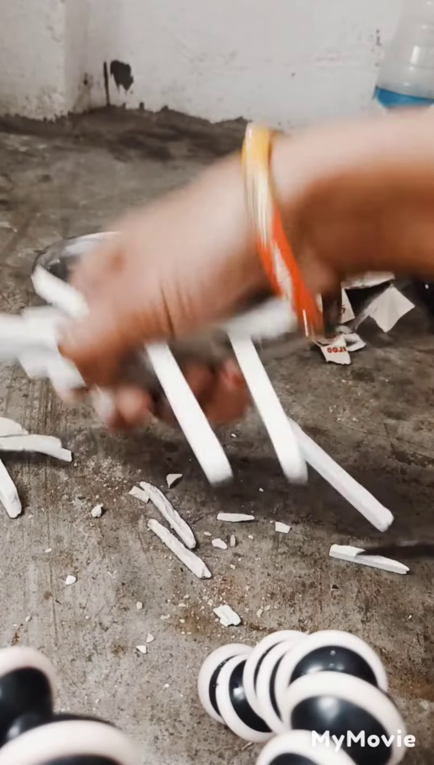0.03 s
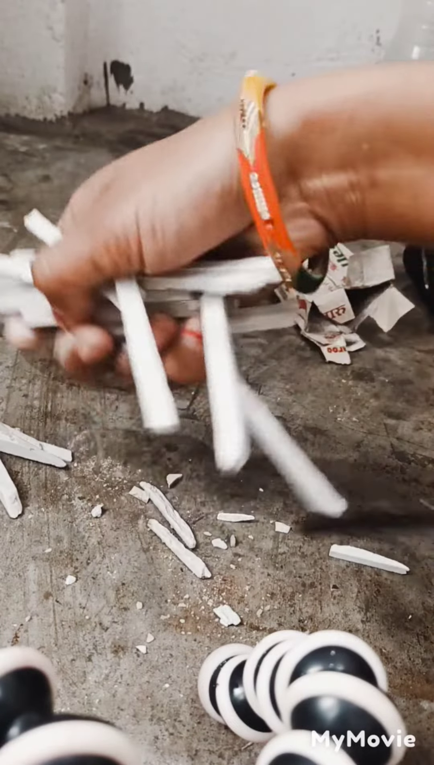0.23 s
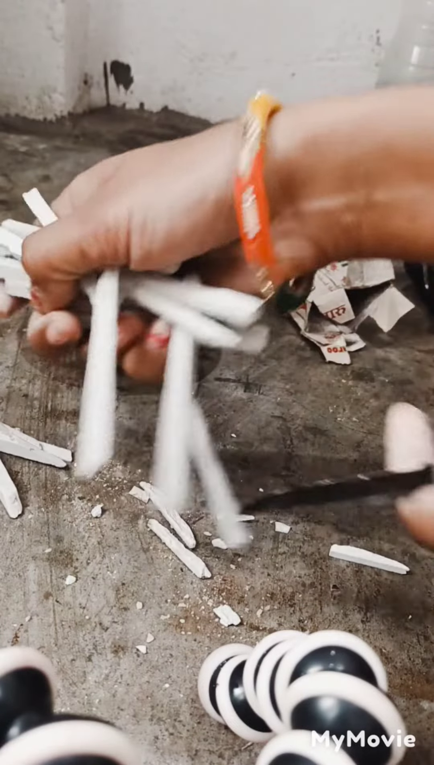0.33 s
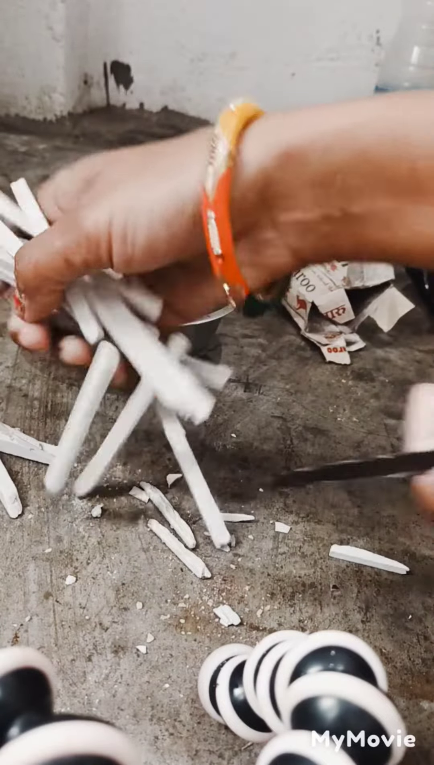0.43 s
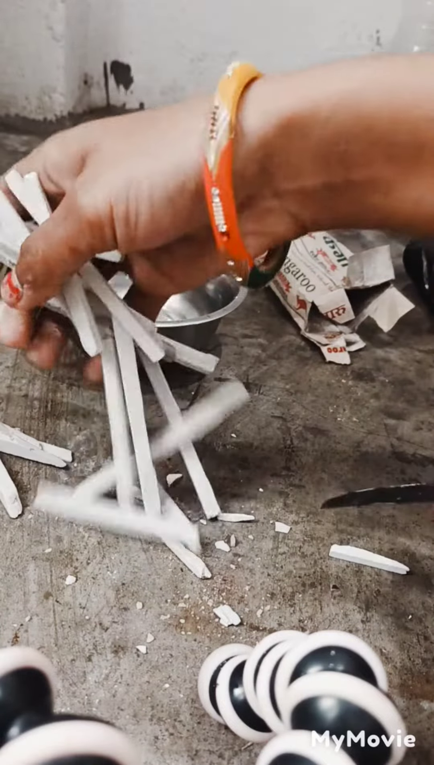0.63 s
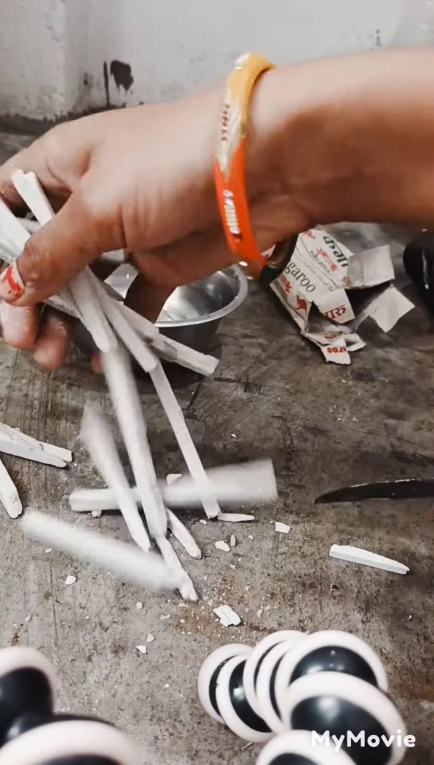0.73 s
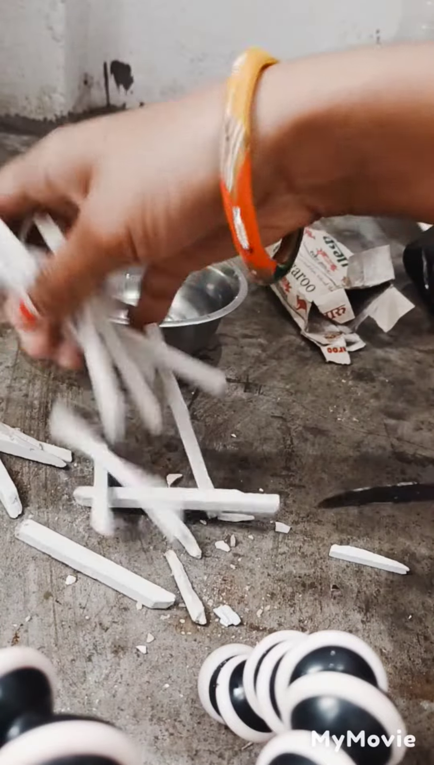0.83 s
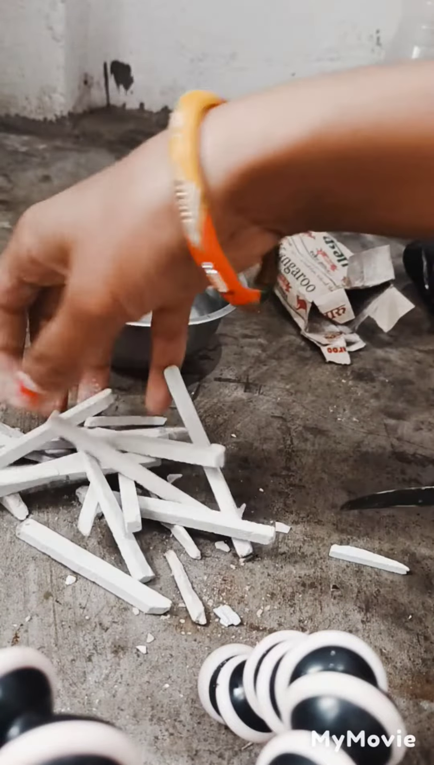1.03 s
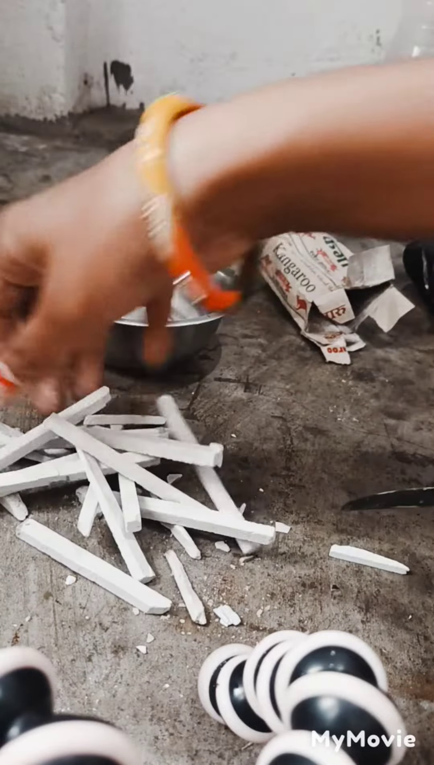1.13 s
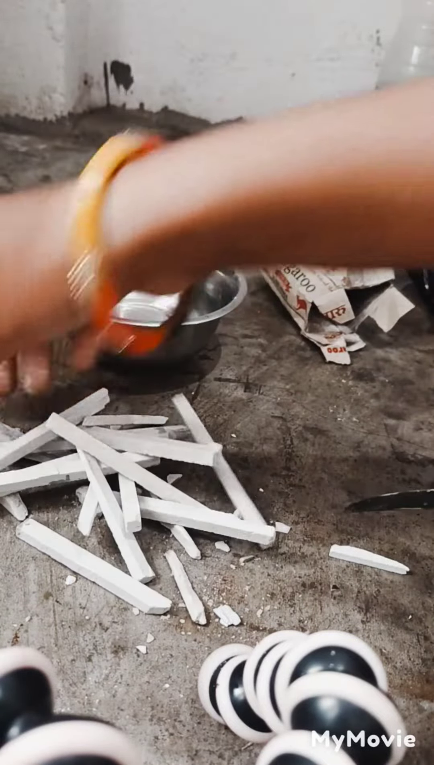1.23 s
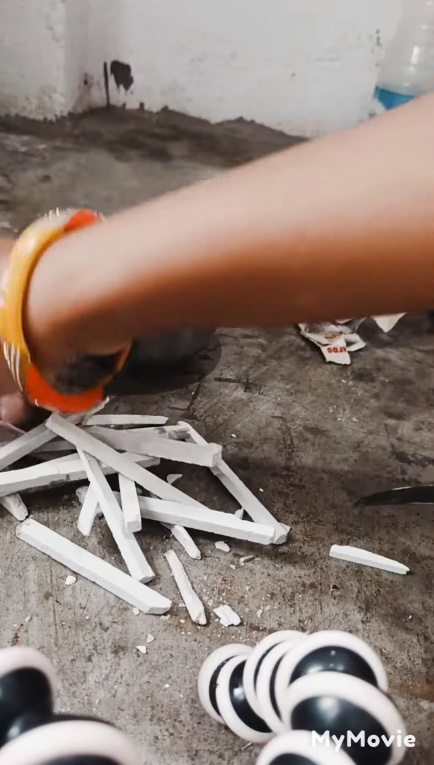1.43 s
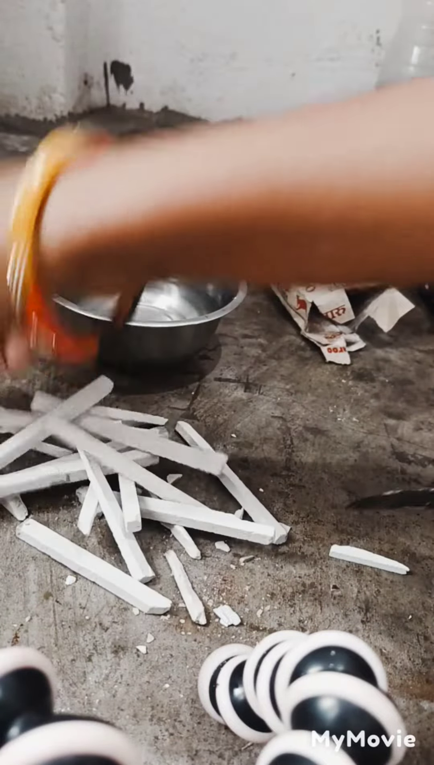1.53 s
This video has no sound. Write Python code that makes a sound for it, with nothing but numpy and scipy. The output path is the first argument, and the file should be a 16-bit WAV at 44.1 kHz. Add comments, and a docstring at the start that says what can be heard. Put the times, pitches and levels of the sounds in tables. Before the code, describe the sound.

Slate pencils dropped in a loose pile on concrete, sharp bright clicks in a small bare room

```python
"""Slate pencils dropped in a pile

A hand gathers stone slate pencils and lets them drop on a concrete floor, close to the microphone.
Each contact is a hard click of shaped noise with a very short ring; two spills rattle with small contacts.
A small bare room answers with a bright noise tail, standing waves and a hollow bloom.
A low boom of tone and narrow noise, faint noise swishes and steady air lie behind."""
import sys
import numpy as np
from scipy import signal
from scipy.fft import rfft, irfft
from scipy.io import wavfile

SR = 44100
rng = np.random.default_rng(int(sys.argv[2]) if len(sys.argv) > 2 else 0)


def dump(signal):
    """Clip the signal to [-1, 1] and save it as 16-bit WAV at the path in sys.argv[1]."""
    limited = np.clip(np.atleast_2d(signal).T, -1, 1)
    pcm = np.round(limited * 32767).astype(np.int16)
    wavfile.write(sys.argv[1], SR, pcm)


N = 70560

# Single contacts. Each row: start in seconds, level in dB, knock (lows) in dB, edge (highs) in dB,
# sheen (top treble) in dB, chatter decay in seconds, ring in Hz, ring level in dB,
# left over right in dB, room level in dB.
CONTACTS = [ (0.0895, -7, 3.5, -6, -4, 0.004, 1444, -5, 1, -4),
            (0.2202, -15, 8.5, 9.5, 6.5, 0.0028, 988, -10, 0, -3),
            (0.309, -17, -31, -10, -11, 0.0013, 2520, -13, 2.5, -6.5),
            (0.3991, -31.5, 4.5, 10.5, -12, 0.0022, 2650, -17.5, -4, -7.5),
            (0.4273, -1.5, -1, 0, 2, .001, 8710, 6.5, 1.5, 5),
            (0.5473, -11, 10, -3.5, -6, 0.0054, 984, -20, 3, -3.5),
            (0.6386, -15, 4.5, 5, 3, 0.00041, 9260, 4.5, 2.5, 1),
            (0.6672, -13, 3.5, 8, 0.5, 0.0013, 2570, -5.5, -1, -0.5),
            (0.681, -27, -3, 2, -8, 0.00088, 6750, -11.5, 0, -18),
            (0.718, -17.5, 3.5, -2.5, 2.5, 0.0027, 7000, -26, 4, -8),
            (0.7729, -32.5, 18.5, -22, -5.5, 0.002, 6800, -17.5, 2, -13.5),
            (0.7790, -23.5, 4, 8, -5, 0.0022, 10100, -8.5, 3, 7),
            (0.7931, -5.5, -14.5, 8.5, -3, 0.00032, 7560, 7, 1.5, -4.5),
            (0.8142, -27, -10.5, 16, 8, 0.00092, 2934, -6, 2, -4.5),
            (0.8578, -14, -41, -3.5, 1, 0.0015, 2460, -3.5, 0.5, -3.5),
            (0.884, -21, 7, 11.5, 3.5, .001, 9700, -0.5, 1, -2.5),
            (0.9136, -17.5, -7, -3, -4.5, 0.00087, 2395, -11.5, -0.5, 16),
            (0.9196, -6.5, -10, 7.5, 5, 0.00062, 9330, 6.5, -2, 6.5),
            (0.9262, -8, 1.5, -21, -11, 0.00076, 2510, -16, -8, 5.5),
            (0.9354, 11, -12.5, -9, -12, 0.001, 5010, 9.5, -1, -5.5),
            (0.9887, 3, -7, 6, -1.5, 0.0033, 7015, 14.5, -1.5, -1.5),
            (1.0298, -6, -2.5, 2.5, 3, 0.001, 4980, -3, 7, 0),
            (1.0332, -7, -2.5, 7, -0.5, 0.0044, 6940, 2.5, 0, 2),
            (1.0441, -5, -3, -3.5, 7, 0.00043, 2417, 0, -5, 0.5),
            (1.151, -12, -1.5, -3.5, -29, 0.0011, 10370, -1.5, -1, -0.5),
            (1.3028, 4.5, -6.5, -10.5, -4.5, 0.0011, 5020, 10.5, 4, -4.5),
            (1.5595, -18.5, -6, 7, -10, 0.0014, 6510, -9, 0, 0.5), ]
# Colour of a stone contact. Each row: frequency in Hz, gain in dB.
STONE_COLOUR = [(100, -17), (250, -17), (450, -8), (720, -11.5), (1000, -4), (1600, -9.5), (2400, -3.5),
                (3300, -5), (5000, -1), (7100, -0.5), (8200, -10), (9700, -0.5), (11000, -2.5),
                (13100, -18), (14900, -4.5), (16000, -29.5)]
# Rattles of small contacts. Each row: start in seconds, length in seconds, level in dB,
# knock in dB, edge in dB.
RATTLES = [(0.441, .065, -12.5, 5, 2), (.945, .13, -12, 0, 0.5)]
# Room tail. Each row: frequency in Hz, gain in dB, T60 in seconds, left over right in dB.
ROOM_TAIL = [(100, -8, 0.79, 17.5), (250, 16.5, 0.56, 5.5), (430, 14, 0.6, 5.5), (540, 12, 0.21, 20),
             (730, -6.5, 0.31, -16), (926, 7.5, 0.44, 7.5), (1600, 6, 0.34, -6), (2470, 3, 0.3, 1.5),
             (5500, 3.5, 0.31, 0.5), (9270, -0.5, 0.25, 2), (15000, -2, 0.14, -10.5)]
# Standing waves of the room. Each row: frequency in Hz, level in dB, T60 in seconds, left over right in dB.
STANDING_WAVES = [(171, -62, 0.58, 12), (307, -65, .4, -10), (705, -54, 0.87, -7.5),
                  (1002, -57.5, .55, -10.5)]
# Low boom swells. Each row: peak in seconds, rise in seconds, fall in seconds, level in dB,
# upper modes in dB.
BOOM_SWELLS = [(.155, 0.048, 0.073, -70, -14), (0.532, 0.062, 0.061, -50, -3.5),
               (0.718, 0.3, 0.19, -69.5, -1.5), (1.011, 0.19, 0.14, -64.5, 10),
               (1.126, 0.11, 0.046, -56.5, 8), (1.45, 0.21, .25, -82.5, 6.5)]
# Upper boom resonances. Each row: frequency in Hz, level in dB.
BOOM_UPPER_MODES = [(178, -2), (240, -4), (304, -3)]
# Faint hollow swishes. Each row: middle in seconds, length in seconds, level in dB, centre in Hz.
SWISH_EVENTS = [(0.053, 0.15, -66.5, 678), (1.284, 0.04, -71, 660), (1.551, 0.073, -71.5, 650)]
# Colour of the background air. Each row: frequency in Hz, gain in dB.
AIR_COLOUR = [(25, -20.5), (50, -30), (80, 7.5), (120, -4), (180, 3.5), (280, -9.5), (450, -11.5),
              (700, -18), (1000, -19.5), (2500, -14), (6000, -20.5), (10000, -21.5), (16000, -26)]

# Crossover ranges of the colour controls: knock acts below its range, edge and sheen above theirs.
KNOCK_HZ, EDGE_HZ, SHEEN_HZ = (1800, 4540), (5000, 8800), (11200, 11870)
THIN_DB_PER_DB, THIN_HZ = 2.6, 1000  # pencil on pencil: extra bass lost per dB of missing knock
CHATTER_RISE_S = 0.0018
EVENNESS = 0.55  # 0 leaves the noise spectrum ragged, 1 makes it flat
RING_T60_S, RING_RISE_S = 0.011, 0.0006
TWIN_RATIO, TWIN_DB = 1.06, -7  # second bending mode relative to the first

RATTLE_PER_S, RATTLE_FADE_DB, RATTLE_ROOM_DB = 140, -5.5, 0
RATTLE_CHATTER_S, RATTLE_RING_DB = 0.0011, 4

EARLY_S, EARLY_DB = 0.012, -4
BASS_BUILD_S, BASS_HZ = 0.016, 650
HOLLOW_FROM_HZ, HOLLOW_TO_HZ, HOLLOW_S, HOLLOW_DB, HOLLOW_LEFT_DB = 560, 348, 0.1, -39.5, 6.5

BOOM_HZ, BOOM_WIDTH_HZ, BOOM_LEFT_DB = 81, 13.6, 3.5
SWISH_WIDTH_HZ = 126
AIR_DB, AIR_SHARED_HZ = -71, 500
CUTOFF_HZ = 16300


def clicks():
    """Single pencils strike each other and the floor; the room answers each blow."""
    out = np.zeros((2, N))
    for start_s, *stone, left_db, room_db in CONTACTS:
        click = contact(*stone)
        add(out, start_s, click * sides(left_db))
        add(out, start_s, amp(room_db) * room(click))
    return out


def contact(level_db, knock_db, edge_db, sheen_db, chatter_s, ring_hz, ring_db, size=2048):
    """Stone chatters on stone for a few milliseconds; the pencil rings briefly in two close bending modes."""
    t, hz = np.arange(size) / SR, np.fft.rfftfreq(size, 1 / SR)
    chatter = np.exp(-t / max(chatter_s, 1 / SR)) * (1 - np.exp(-t / CHATTER_RISE_S))
    grit = rfft(rng.standard_normal((2, size)) * chatter)
    evening_db = -EVENNESS * 20 * np.log10(abs(grit) + 1e-9)
    grit = np.array([g * causal(db) for g, db in zip(grit, evening_db)])
    grit /= np.sqrt(np.mean(abs(grit) ** 2, axis=1, keepdims=True))

    colour_db = level_db + read(STONE_COLOUR, hz)
    colour_db += np.interp(hz, KNOCK_HZ, [knock_db, 0])
    colour_db -= THIN_DB_PER_DB * max(-knock_db, 0) / (1 + (hz / THIN_HZ) ** 4)
    colour_db += np.interp(hz, EDGE_HZ, [0, edge_db])
    colour_db += np.interp(hz, SHEEN_HZ, [0, sheen_db])
    click = irfft(grit * causal(colour_db))

    fade = decay(t, RING_T60_S) * (1 - np.exp(-t / RING_RISE_S))
    fade *= 2 / fade.sum()
    for mode_hz, db in [(ring_hz, ring_db), (ring_hz * TWIN_RATIO, ring_db + TWIN_DB)]:
        click += amp(db) * fade * np.sin(2 * np.pi * (mode_hz * t + rng.random((2, 1))))
    return click


def spills():
    """Loose pencils settle in a fading run of small contacts."""
    out = np.zeros((2, N))
    rings_hz = [row[6] for row in CONTACTS]
    for start_s, length_s, level_db, knock_db, edge_db in RATTLES:
        count = round(length_s * RATTLE_PER_S)
        for k in range(count):
            part = (k + rng.random()) / count
            db = level_db + RATTLE_FADE_DB * part
            ring_hz, ring_db = rng.choice(rings_hz), db + RATTLE_RING_DB
            click = contact(db, knock_db, edge_db, 0, RATTLE_CHATTER_S, ring_hz, ring_db)
            add(out, start_s + part * length_s, click)
    return out + amp(RATTLE_ROOM_DB) * room(out)[:, :N]


def room(sound, size=32768):
    """Dense wall reflections, weaker at first; the bass builds more slowly and the top treble dies soonest."""
    hz, t, z = signal.stft(rng.standard_normal((2, size)), SR, nperseg=512)
    t60_s = read(ROOM_TAIL, hz, axis=2)[:, None]
    build = np.where(hz[:, None] < BASS_HZ, np.minimum(t / BASS_BUILD_S, 1), 1)
    equal_energy = np.sqrt(2 * np.log(1000) / t60_s / SR)  # keeps the level independent of T60
    z = z * build * amp(read(ROOM_TAIL, hz)[:, None]) * decay(t, t60_s) * equal_energy
    z = z * sides(read(ROOM_TAIL, hz, axis=3))[:, :, None]
    tail = signal.istft(z, SR, nperseg=512)[1]

    t = np.arange(tail.shape[1]) / SR
    for mode_hz, db, mode_t60_s, left_db in STANDING_WAVES:
        wave = np.sin(2 * np.pi * (mode_hz * t + rng.random())) * np.minimum(t / BASS_BUILD_S, 1)
        tail = tail + amp(db) * sides(left_db) * wave * decay(t, mode_t60_s)
    tail = tail + hollow(t)
    return signal.fftconvolve(sound, tail * np.where(t < EARLY_S, amp(EARLY_DB), 1), axes=1)


def hollow(t):
    """A short, hollow bloom in the room's answer, sinking in pitch as it swells and fades."""
    part = np.minimum(t / HOLLOW_S, 1)
    turns = np.cumsum(HOLLOW_FROM_HZ + (HOLLOW_TO_HZ - HOLLOW_FROM_HZ) * part) / SR
    bloom = np.sin(np.pi * part) ** 2 * np.sin(2 * np.pi * turns)
    return amp(HOLLOW_DB) * sides(HOLLOW_LEFT_DB) * bloom


def boom():
    """A low tone and a few wavering resonances swell and fade behind the clatter."""
    t, out = np.arange(N) / SR, np.zeros((2, N))
    tone = np.sin(2 * np.pi * BOOM_HZ * t)
    for peak_s, rise_s, fall_s, level_db, upper_db in BOOM_SWELLS:
        ramp = np.interp(t, [peak_s - rise_s, peak_s, peak_s + fall_s], [0, 1, 0])
        swell = np.sin(np.pi / 2 * ramp) ** 2
        # / sqrt(2): same RMS as a sine
        upper = sum(amp(db) * band(hz, BOOM_WIDTH_HZ) / np.sqrt(2) for hz, db in BOOM_UPPER_MODES)
        out += amp(level_db) * swell * (tone + amp(upper_db) * sides(BOOM_LEFT_DB) * upper)
    return out


def swishes():
    """Soft, narrow swells of noise, barely above the background."""
    t, out = np.arange(N) / SR, np.zeros((2, N))
    for middle_s, length_s, level_db, centre_hz in SWISH_EVENTS:
        noise = np.array([band(centre_hz, SWISH_WIDTH_HZ) for _ in range(2)])
        swell = np.cos(np.pi * np.clip((t - middle_s) / length_s, -0.5, 0.5))
        out += amp(level_db) * noise * swell
    return out


def air():
    """Faint steady noise, nearly alike in both ears in the bass and independent in the treble."""
    hz = np.fft.rfftfreq(N, 1 / SR)
    left_right_shared = rfft(rng.standard_normal((3, N)))
    same = 1 / (1 + (hz / AIR_SHARED_HZ) ** 2)
    z = left_right_shared[:2] * np.sqrt(1 - same) + left_right_shared[2] * np.sqrt(same)
    noise = irfft(z * amp(read(AIR_COLOUR, hz)), N)
    return amp(AIR_DB) * noise / noise.std()


def band(centre_hz, width_hz):
    """Narrow noise of unit RMS: a resonance that wavers; the width is the Gaussian's sigma."""
    hz = np.fft.rfftfreq(N, 1 / SR)
    bell = np.exp(-((hz - centre_hz) / width_hz) ** 2 / 2)
    noise = irfft(rfft(rng.standard_normal(N)) * bell, N)
    return noise / noise.std()


def decay(t, t60_s):
    """Exponential fade, 60 dB down after T60."""
    return np.exp(-np.log(1000) * t / t60_s)


def causal(db):
    """Minimum-phase response for a gain curve."""
    log_gain = np.log(amp(np.concatenate([db, db[-2:0:-1]])))
    return np.exp(np.conj(signal.hilbert(log_gain)))[:len(db)]


def amp(db):
    """Decibels to gain."""
    return 10 ** (np.asarray(db) / 20)


def read(points, hz, axis=1):
    """One column of a table, joined on a log-frequency axis."""
    table = np.transpose(points)
    return np.interp(np.log(hz + 1), np.log(table[0] + 1), table[axis])


def sides(db):
    """Left and right gains for a level difference."""
    return amp(np.array([db, -db]) / 2).reshape(2, -1)


def add(mix, start_s, sound):
    """Mixes a sound in at a time, cut at the end of the mix."""
    part = mix[:, max(round(start_s * SR), 0):][:, :sound.shape[1]]
    part += sound[:, :part.shape[1]]


def scene():
    """Clicks, rattle, boom, swishes and air together."""
    return clicks() + spills() + boom() + swishes() + air()


def record(dry):
    """The recorder's band limit: a linear-phase low-pass."""
    lowpass = signal.firwin(255, CUTOFF_HZ, window=("kaiser", 9), fs=SR)
    return signal.oaconvolve(dry, lowpass[None], "same")


dry = scene()
out = record(dry)
dump(out)
```